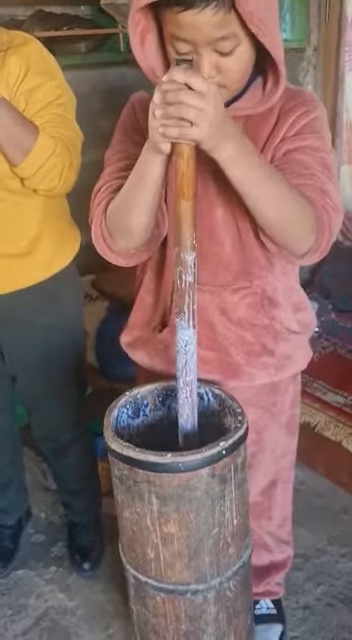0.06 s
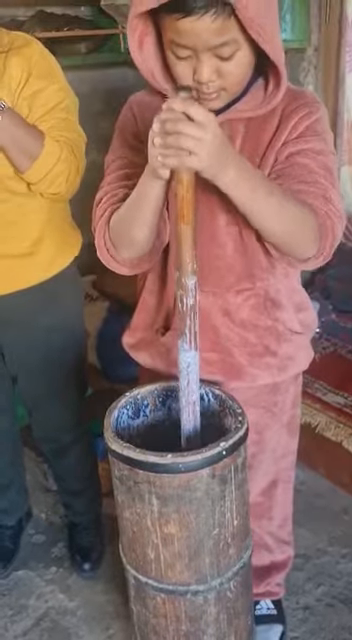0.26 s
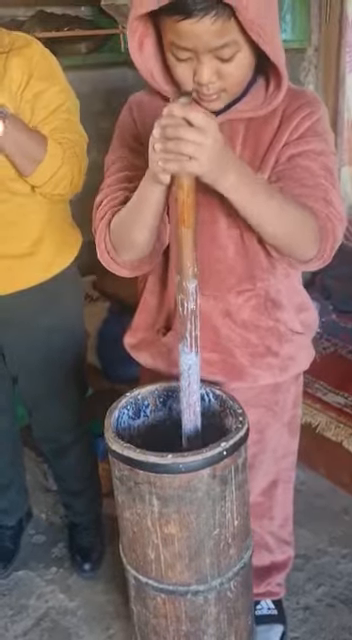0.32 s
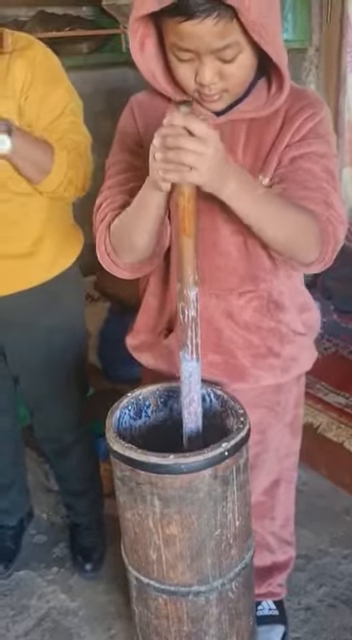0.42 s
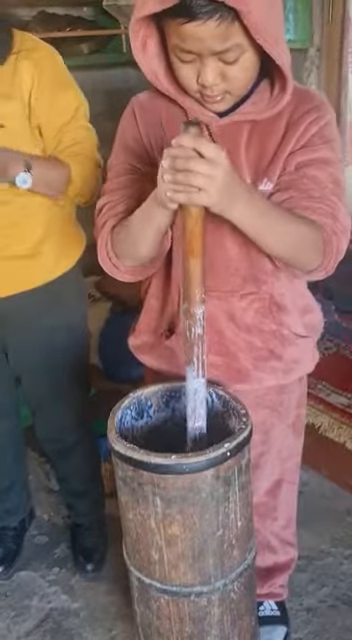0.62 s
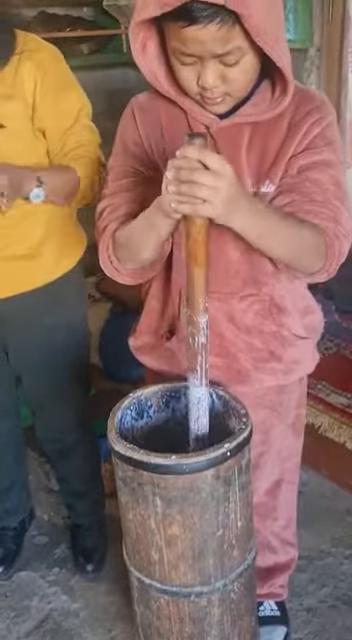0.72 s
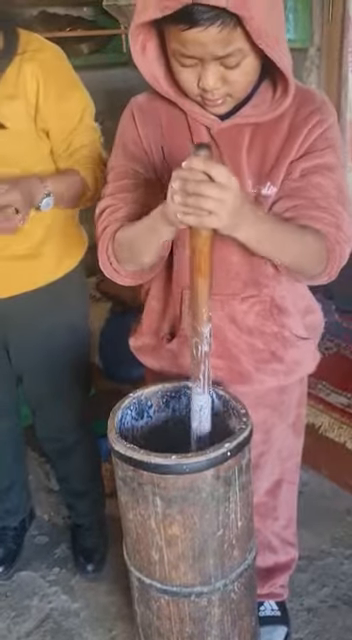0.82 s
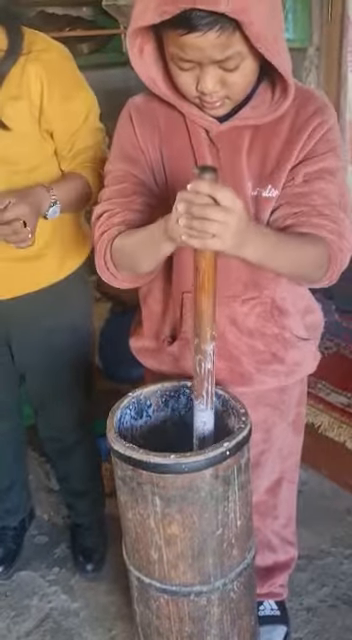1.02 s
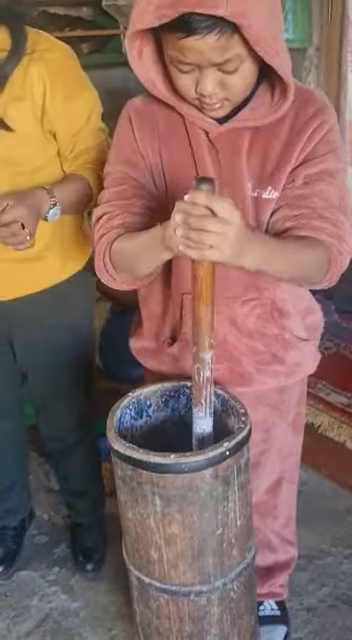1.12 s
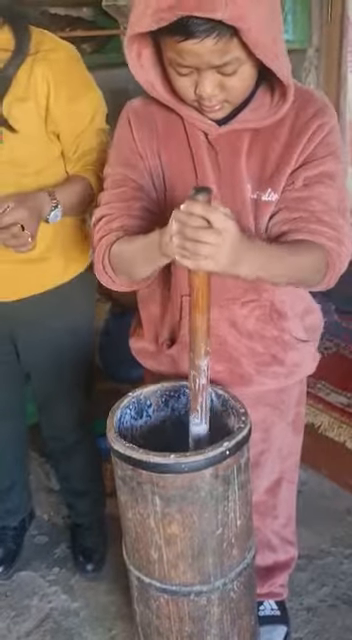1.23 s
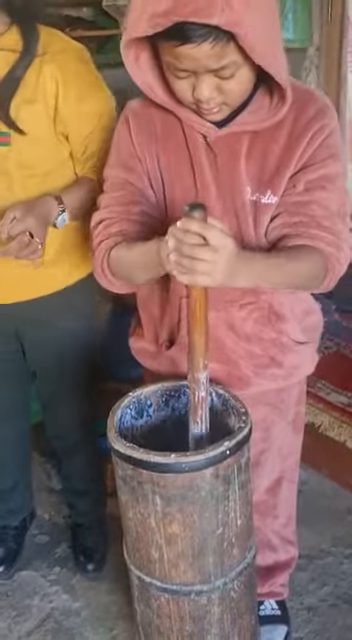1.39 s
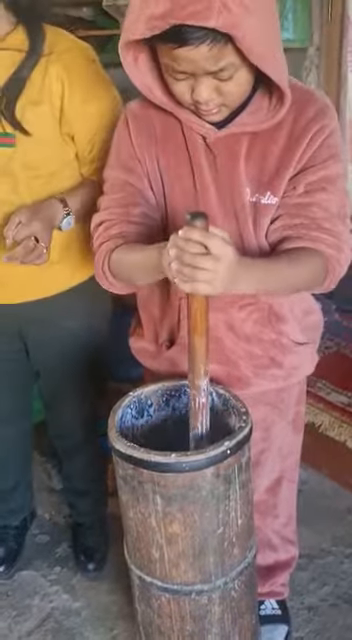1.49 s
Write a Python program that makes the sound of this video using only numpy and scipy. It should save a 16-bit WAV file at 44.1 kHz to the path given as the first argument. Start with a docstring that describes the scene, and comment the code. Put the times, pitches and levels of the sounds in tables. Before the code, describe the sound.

A plunger is pushed down a tall wooden churn, close up in a small quiet room. Faint wet fizz with ticks swells from 0.1 s into a hard, deep hollow bump at 0.24 s. Soft wooden rubbing and knocks follow, with bright ticks near 0.43 s and grainy wet scraping strongest around 0.6-0.8 s. After 0.9 s it is nearly quiet, with a smaller knock at 1.23 s and faint dragging afterward.

```python
"""Over quiet room tone and a thin hiss, a wet fizz with small ticks swells into a hard wooden bump.
A plunger is being pushed slowly down a tall wooden churn in a small room, close to a two-port microphone.
Bumps and dragging ring the staves and the air column as dying sine waves, and the base thrums as low noise.
The wet shaft is noise: grainy for its fizz and scrape, narrow for squeezed liquid. Very short bursts of
noise make the wet ticks and the bright edge of one later bump."""
import sys
import numpy as np
from scipy import signal
from scipy.fft import rfft, irfft, next_fast_len
from scipy.io import wavfile
from scipy.ndimage import uniform_filter1d

SR = 44100
rng = np.random.default_rng(int(sys.argv[2]) if len(sys.argv) > 2 else 0)


def decibels_to_gain(level_db):
    """Convert a level in decibels to a linear amplitude gain (20 dB per decade)."""
    exponent = np.asarray(level_db, float) / 20
    return 10 ** exponent


def generate_wav(signal):
    """Clip the signal to [-1, 1] and save it as 16-bit WAV at the path in sys.argv[1]."""
    frames = np.transpose(np.atleast_2d(signal))
    scaled = np.clip(frames, -1, 1) * 32767
    pcm = np.round(scaled).astype(np.int16)
    wavfile.write(sys.argv[1], SR, pcm)


N = 68355  # length in samples
T = np.arange(N) / SR  # time in seconds

# Bumps of the plunger on the wall; the last three are relative to the force:
# start_s, force_db, upper_db, deep_db, stave_db
BUMPS = [(0.218, -45, -16, -21, -12), (0.236, -15.5, -34, -42, -44), (0.255, -25, -51, -11.5, -36),
         (0.291, -45.5, 0, -13, -14), (0.305, -35.5, -18.5, -39, -37), (0.338, -31, 2.5, -40, -14),
         (0.356, -38, -39, -41, -11.5), (0.442, -40.5, -21, -8, -8), (0.519, -34.5, -5.5, -26, -7.5),
         (0.54, -39.5, -43, -6.5, -4), (0.611, -42.5, -35, -9, -20), (0.791, -35.5, -5, -41, -11),
         (0.842, -43.5, -32, -5, -11), (0.952, -41.5, -11.5, -18, -9), (0.963, -47.5, -39, 1, -22),
         (1.016, -40.5, -11.5, -22, -9), (1.032, -47.5, -8, -22, -5), (1.075, -40, -21, -4, -33),
         (1.097, -42, -38.5, -3, -23), (1.229, -27, -1, -6, -4), (1.256, -33, -5.5, -32, -9),
         (1.315, -45, -4.5, -9, -29), (1.342, -43, -33, -4.5, -24), (1.416, -35.5, -19.5, -5, -21),
         (1.432, -39, -20, -14, -6), (1.509, -40, -14.5, -9.5, -8.5)]
# Drag of the plunger along the wall, one level for each family of modes:
# time_s, body_db, upper_db, deep_db, stave_db
DRAG_LEVELS = [(0, -105, -82, -94, -80), (.24, -105, -78, -95, -89), (.37, -46, -69, -49.5, -52.5),
               (.44, -47.5, -55.5, -54, -59.5), (.63, -53.5, -53.5, -51, -54), (.67, -61, -66, -87, -70.5),
               (.8, -49, -64.5, -54, -60.5), (.92, -70, -90, -63, -84), (1.05, -70, -82.5, -61.5, -58),
               (1.2, -67, -73.5, -77, -78.5), (1.3, -47, -68, -65, -57), (1.55, -72.5, -85, -51, -70)]

# Ringing modes of churn and air column, with the time each takes to fall by 60 dB:
# pitch_hz, level_db, fall_s
DEEP_MODES = [(120.04, 9, 0.15)]
BODY_MODES = [(205.4, -3, 0.092), (223.95, 1.5, 0.089), (259.7, -5, 0.099)]
UPPER_MODES = [(610, -8, 0.045), (690, 0, 0.055), (830, -6, 0.04), (1050, -6, 0.09), (1220, -10, 0.03)]
STAVE_MODES = [(379.9, -0.5, 0.088), (307.7, -10, 0.27)]
DEEP_RISE_S, BODY_RISE_S, UPPER_RISE_S = 0.027, 0.0058, 0.0014
MODE_SPREAD_DB, MODE_DETUNE = 1.5, 0.015  # chance changes in level, and in pitch as a share
SLIPS_PER_S, SLIP_SPREAD_DB = 260, 1.5

# Hard edge of one late bump: start_s, level_db, low_hz, high_hz, fall_s (to -60 dB)
CRACK = (1.229, -57, 1400, 2800, .11)

# Thrum of the base on the floor: time_s, level_db
THRUM_LEVELS = [(0, -77), (.05, -87), (.2, -92), (.25, -35.5), (.32, -53.5), (.42, -66), (.62, -54),
                (.7, -65), (.8, -71), (.86, -78), (1.2, -93), (1.24, -66.5), (1.55, -75)]
# Modes of base and floor: centre_hz, width_hz, level_db
THRUM_MODES = [(63.6, 12, -1), (95.7, 14.6, -0.5)]

# Fizz of the wet shaft along the stroke: time_s, level_db, tilt_db (per octave)
FIZZ_PATH = [(0, -84, -8), (.085, -63.5, -9), (.125, -68, 0), (.155, -51.5, 4), (.21, -47, 0.5),
             (.26, -58, -5), (.32, -59.5, -4), (.345, -81, 2), (.385, -75.5, 1.5), (.4, -51, -9.5),
             (.455, -100, 13.5), (.48, -61, -11.5), (.53, -61.5, -0.5), (.64, -53.5, -5.5), (.7, -57, -5.5),
             (.79, -55.5, -6.5), (.84, -55.5, -2.5), (.88, -89, -17.5), (1.26, -80, -7), (1.28, -69, 11),
             (1.33, -79.5, -17.5), (1.44, -76, -16.5), (1.55, -86.5, 0)]
# Basic tone of the fizz: pitch_hz, level_db
FIZZ_COLOUR = [(1500, -35), (2900, -11), (3900, -2.5), (5200, -1), (6200, -7), (7100, 7), (9300, -0.5),
               (12000, -3.5), (15300, -2), (16400, -23)]
FIZZ_PATCH_DB = 1.6
GRAINS_PER_S, GRAIN_SPREAD_DB, GRAIN_FADE_S = 260, 4.0, 0.0018

# Wet scrape along the stroke: time_s, level_db
SCRAPE_LEVELS = [(0, -83), (.41, -71), (.45, -62.5), (.52, -62), (.59, -51.5), (.65, -54.5), (.71, -55),
                 (.78, -64), (.86, -91.5), (1.55, -93.5)]
# Resonances of the scrape: centre_hz, width_hz, level_db
SCRAPE_PEAKS = [(1850, 150, 1), (2000, 110, 2), (2220, 170, 3), (2480, 150, -5), (3050, 400, -5),
                (3550, 200, -8)]
SCRAPE_WANDER, SCRAPE_SWELL_DB = 0.013, 2.5  # drift in pitch (share) and in strength

# Faint narrow hisses of liquid squeezing past the shaft:
# start_s, length_s, level_db, centre_hz, width_hz
SQUEEZES = [(0.047, .03, -69, 3530, 300), (0.08, 0.075, -70, 3186, 150), (0.138, 0.09, -56.5, 4010, 450),
            (.15, 0.14, -60, 4880, 900), (0.393, 0.069, -62, 3670, 694), (0.497, 0.24, -61.5, 7130, 690),
            (1.049, .03, -73, 3490, 803), (1.16, 0.15, -75.5, 1120, 100), (1.429, 0.1, -73.5, 2500, 70)]

# Wet ticks, and at 1.2295 s the short bright edge of the hard wooden bump;
# levels are 6 dB above their average strength: start_s, level_db, centre_hz, width_hz
SHORT_BURSTS = [(0.1624, -42, 4040, 1490), (0.2007, -35.5, 10100, 9000), (.203, -42.5, 3850, 1520),
                (0.206, -36.5, 10800, 4050), (0.268, -48, 7560, 1200), (0.4262, -36, 9300, 3640),
                (0.426, -40.5, 11500, 5730), (0.4308, -45.5, 3380, 1010), (0.64, -40, 11100, 6700),
                (0.702, -46, 4120, 700), (0.7891, -42, 6660, 11950), (1.185, -67, 2750, 600),
                (1.2295, -55.5, 3720, 1500), (1.276, -61, 8270, 1520), (1.317, -64, 9130, 9000)]
BURST_S = 0.0035

ROOM_T60_S, ROOM_DULL_HZ = 0.16, 14000
WOOD_ROOM_DB, WET_ROOM_DB, BURST_ROOM_DB = -9, -3, -18  # how much of each goes into the room

# Tone of the quiet room; only its shape counts: pitch_hz, level_db (per Hz)
AIR_COLOUR = [(20, -2), (60, -11.5), (300, -6), (800, -2.5), (1200, -5.5), (2200, -9.5), (5000, -19.5),
              (9000, -25.5), (16400, -23)]
AIR_DB = -72.5


def wood(modes, rise_s, column):
    """One family of modes, rung by the bumps and by many small slips as the plunger drags."""
    out = np.zeros(N)
    chance = rng.standard_normal((len(BUMPS) + 3, 2, len(modes)))
    for row, bump_chance in zip(BUMPS, chance[3:]):
        relative_db = row[column] if column > 1 else 0  # the body takes the force as it is
        add(out, row[0], decibels_to_gain(row[1] + relative_db) * ring(modes, rise_s, bump_chance))
    slips = np.zeros(N)
    for slip_chance in chance[:3]:  # three slightly different rings
        hits = clicks(SLIPS_PER_S / 3, SLIP_SPREAD_DB)
        slips += signal.oaconvolve(hits, ring(modes, rise_s, slip_chance))[:N]
    return out + decibels_to_gain(curve(DRAG_LEVELS, column)) * evened(slips)


def ring(modes, rise_s, chance):
    """Modes that build up during a soft contact and die away; chance shifts level and pitch a little."""
    t = T[:SR // 3, None]
    hz, db, t60 = np.transpose(modes)
    level_db = db + MODE_SPREAD_DB * chance[0] - 60 * t / np.abs(t60)
    pitch_hz = hz * (1 + MODE_DETUNE * chance[1])
    wave = (decibels_to_gain(level_db) * np.sin(2 * np.pi * pitch_hz * t)).sum(1)
    wave = wave * (1 - np.exp(-(t[:, 0] / rise_s) ** 2))
    return wave / abs(wave).max()


def clicks(per_s, spread_db):
    """Single-sample clicks at random times and of random sign, a few of them large."""
    happens = rng.random(N) < per_s / SR
    sign = rng.choice([-1., 1.], N)
    return happens * sign * decibels_to_gain(spread_db * np.minimum(rng.exponential(1, N), 4))


def crack(s, db, low_hz, high_hz, t60):
    """A short dying burst of noise in one band, standing for dense high wood modes."""
    out, t = np.zeros(N), T[:6000]
    band_filter = signal.butter(3, [low_hz, high_hz], "band", fs=SR, output="sos")
    band = signal.sosfilt(band_filter, rng.standard_normal(6000))
    fade_in = np.minimum(t * 1000, 1)  # 1 ms
    add(out, s, decibels_to_gain(db - 60 * t / t60) * fade_in * evened(band))
    return out


def thrum():
    """Low noise ringing in the modes of base and floor."""
    noise, modes = rng.standard_normal(N), np.zeros(N)
    for hz, width, db in THRUM_MODES:
        modes += decibels_to_gain(db) * evened(resonate(resonate(noise, hz, width), hz, width))
    return decibels_to_gain(curve(THRUM_LEVELS, 1)) * evened(modes)


def fizz():
    """Bright grainy hiss with drifting patches and a tilt that changes along the stroke."""
    hz, t, cells = signal.stft(coloured(grainy(), FIZZ_COLOUR), SR, nperseg=256)
    patches = rng.standard_normal(cells.shape)
    for axis in (0, 1):  # smooth over pitch, then over time
        patches = uniform_filter1d(patches, size=8, axis=axis)
    octaves = np.log2((hz[:, None] + 50) / 7000)  # the tilt turns around 7 kHz
    tilt_db = np.interp(t, T, curve(FIZZ_PATH, 2)) * octaves
    shaped = cells * decibels_to_gain(FIZZ_PATCH_DB * evened(patches) + tilt_db)
    hiss = signal.istft(shaped, SR, nperseg=256)[1][:N]
    return decibels_to_gain(curve(FIZZ_PATH, 1)) * evened(hiss)


def scrape():
    """Grainy friction in a cluster of resonances that shift and blend."""
    noise, peaks = grainy(), np.zeros(N)
    for hz, width, db in SCRAPE_PEAKS:
        moving_hz = hz * (1 + SCRAPE_WANDER * drift())
        strength = decibels_to_gain(db + SCRAPE_SWELL_DB * drift())
        peaks += strength * evened(resonate(resonate(noise, moving_hz, width), moving_hz, width))
    nearby_rms = np.sqrt(uniform_filter1d(peaks ** 2, size=4000))
    return decibels_to_gain(curve(SCRAPE_LEVELS, 1)) * peaks / nearby_rms


def grainy():
    """Noise whose power jumps up at random clicks and fades after each, over a steady floor."""
    burst = np.exp(-T[:600] / GRAIN_FADE_S)
    grains = clicks(GRAINS_PER_S, GRAIN_SPREAD_DB) ** 2
    power = 0.5 + signal.oaconvolve(grains, burst)[:N]
    return rng.standard_normal(N) * np.sqrt(power)


def drift():
    """Slow chance, changing within about 60 ms."""
    smooth = uniform_filter1d(rng.standard_normal(N), size=2500)
    return evened(uniform_filter1d(smooth, size=2500))


def squeezes():
    """Liquid squeezing past the shaft: narrow noise that rises quickly and fades; the longest is cut short."""
    out, t = np.zeros(N), T[:8000]  # the longest is cut off after 8000 samples, while still sounding
    for s, length, db, hz, width in SQUEEZES:
        noise = rng.standard_normal(9000)
        band = evened(resonate(resonate(noise, hz, width), hz, width))[1000:]  # skip the filter's start
        swell = np.sin(np.pi * np.minimum(t / length, 1) ** 0.54)
        add(out, s, decibels_to_gain(db) * band * swell)
    return out


def short_bursts():
    """Wet ticks and the bright edge of one bump: tiny smooth bursts of noise, each in its own band."""
    out, t = np.zeros(N), T[:400]
    swell = np.sin(np.pi * np.minimum(t / BURST_S, 1)) ** 2
    for s, db, hz, width in SHORT_BURSTS:
        burst = rng.standard_normal(400)
        for _ in range(3):
            burst = resonate(burst, hz, width)
        burst = (burst * swell)[:round(BURST_S * SR)]
        add(out, s, decibels_to_gain(db) * evened(burst) / 2)
    return out


def resonate(x, hz, width):
    """A resonance of gain 1, fixed or moving: shift its pitch to zero, smooth, and shift back."""
    turn = np.exp(2j * np.pi * np.cumsum(hz * np.ones(len(x))) / SR)
    r = np.exp(-np.pi * abs(width) / SR)
    return 2 * (turn * signal.lfilter([1 - r], [1, -r], x / turn)).real


def ports(x, lag_s, balance_db):
    """Direct sound at two ports: the right one later by lag_s, balance_db is left minus right."""
    size = next_fast_len(N + 200)
    padded = np.pad(x, (0, size - N), "linear_ramp")
    delay = np.exp(-2j * np.pi * np.fft.rfftfreq(size, 1 / SR) * lag_s)
    late = irfft(rfft(padded) * delay, size)[:N]
    return np.array([x * decibels_to_gain(balance_db / 2), late * decibels_to_gain(-balance_db / 2)])


def room(x):
    """Short tail of sparse echoes, different at each port, the treble weaker."""
    size = SR // 3
    taps = np.zeros((2, size))
    slots = np.arange(150, size - 22, 22)  # one echo in every 22 samples
    at = slots + rng.integers(0, 22, (2, len(slots)))
    np.put_along_axis(taps, at, rng.choice([-1., 1.], at.shape), 1)
    taps *= decibels_to_gain(-60 * T[:size] / ROOM_T60_S)
    taps /= np.linalg.norm(taps[0])
    taps = signal.lfilter(*signal.butter(1, ROOM_DULL_HZ, fs=SR), taps)
    return signal.fftconvolve(x[None], taps, axes=1)[:, :N]


def air():
    """Quiet room tone: the same two noises, mixed differently at each port."""
    a, b = rng.standard_normal((2, N))
    pair = np.array([a + 0.9 * b, a - 1.8 * b])
    return decibels_to_gain(AIR_DB) * evened(coloured(pair, AIR_COLOUR))


def evened(x):
    """Scales to an average strength (rms) of 1."""
    return x / np.sqrt(np.mean(x ** 2) + 1e-20)


def curve(table, column):
    """One column of a table, joined by straight lines in time."""
    rows = np.array(table)
    return np.interp(T, rows[:, 0], rows[:, column])


def coloured(x, points):
    """Filters by a spectrum drawn on a log-frequency axis."""
    f, db = np.transpose(points)
    size = x.shape[-1]
    hz = np.fft.rfftfreq(size, 1 / SR)
    gain_db = np.interp(np.log(hz + 1), np.log(f), db, left=-90, right=-90)
    return irfft(rfft(x) * decibels_to_gain(gain_db), size)


def add(mix, s, sound):
    """Mixes a sound in at time s."""
    part = mix[round(s * SR):][:len(sound)]
    part += sound[:len(part)]


def scene():
    """Churn and wet shaft reach the ports directly and by way of the room, over quiet room tone."""
    low = wood(BODY_MODES, BODY_RISE_S, column=1) + wood(DEEP_MODES, DEEP_RISE_S, column=3) + thrum()
    upper = wood(UPPER_MODES, UPPER_RISE_S, column=2) + wood(STAVE_MODES, BODY_RISE_S, column=4)
    upper = upper + crack(*CRACK)
    wet = fizz() + scrape() + squeezes()
    bursts = short_bursts()

    direct = ports(low, lag_s=0.00027, balance_db=-1.7)
    direct = direct + ports(upper, lag_s=0.00049, balance_db=-2.5)
    direct = direct + ports(wet + bursts, lag_s=0.000338, balance_db=-6)

    to_room = decibels_to_gain(WOOD_ROOM_DB) * (upper + 0.37 * low)
    to_room = to_room + decibels_to_gain(WET_ROOM_DB) * wet + decibels_to_gain(BURST_ROOM_DB) * bursts
    return direct + room(to_room) + air()


def top_cut(x):
    """Nothing passes above the cut-off."""
    return signal.sosfilt(signal.butter(12, 16520, fs=SR, output="sos"), x)


def record(dry):
    """The microphone weakens everything below about 50 Hz."""
    low_cut = signal.butter(2, 50, "high", fs=SR)
    mix = signal.lfilter(*low_cut, dry)
    return top_cut(mix)


dry = scene()
out = record(dry)
generate_wav(out)
```